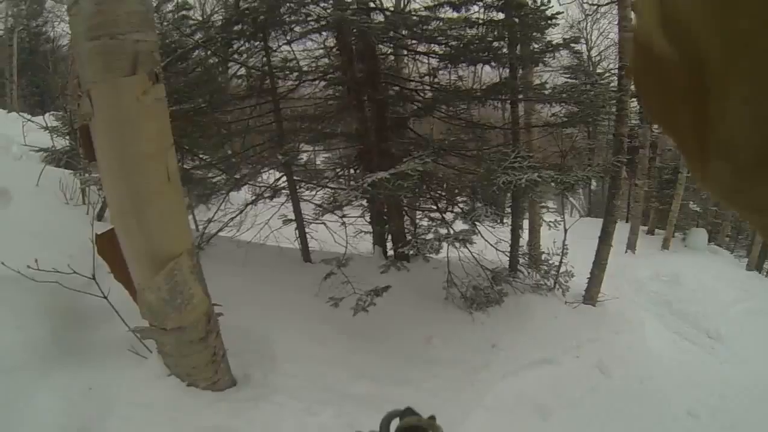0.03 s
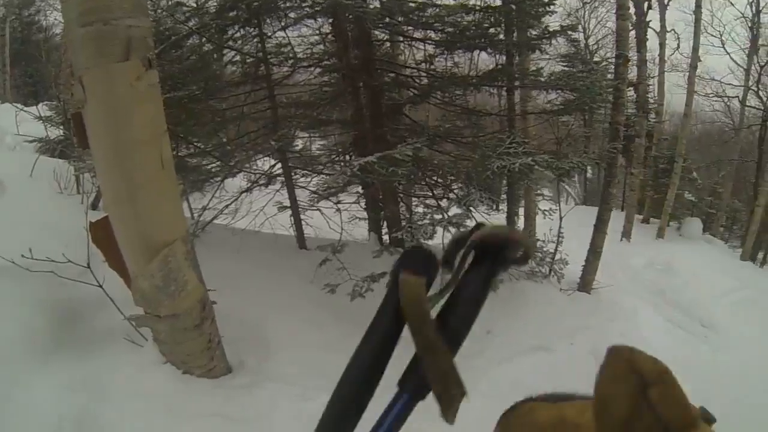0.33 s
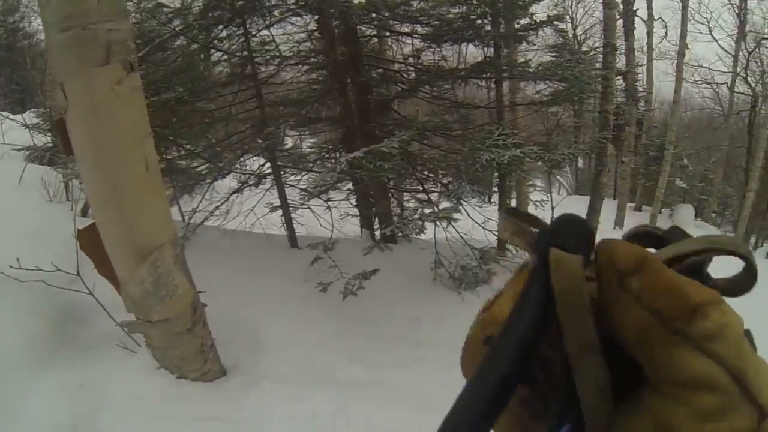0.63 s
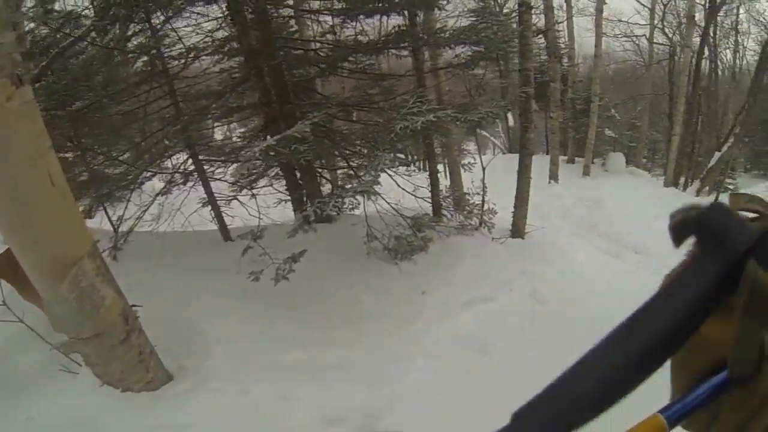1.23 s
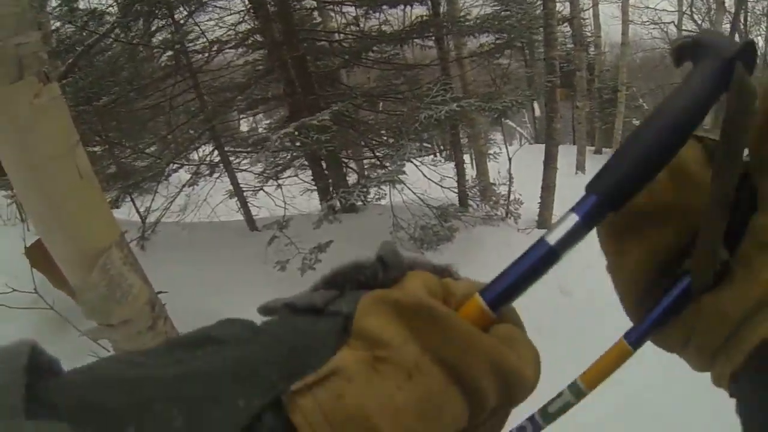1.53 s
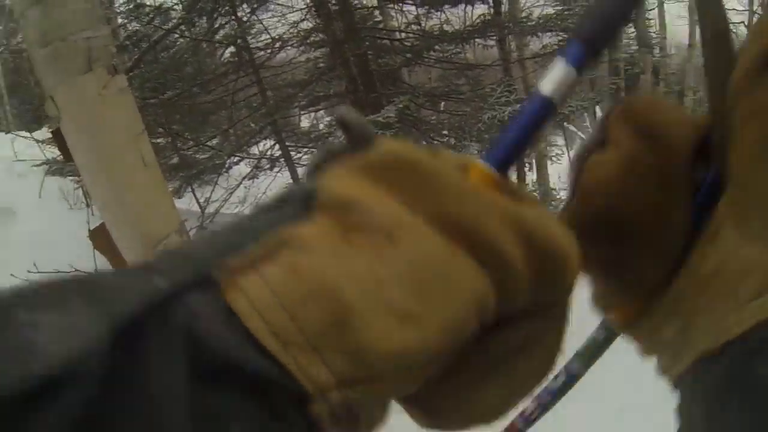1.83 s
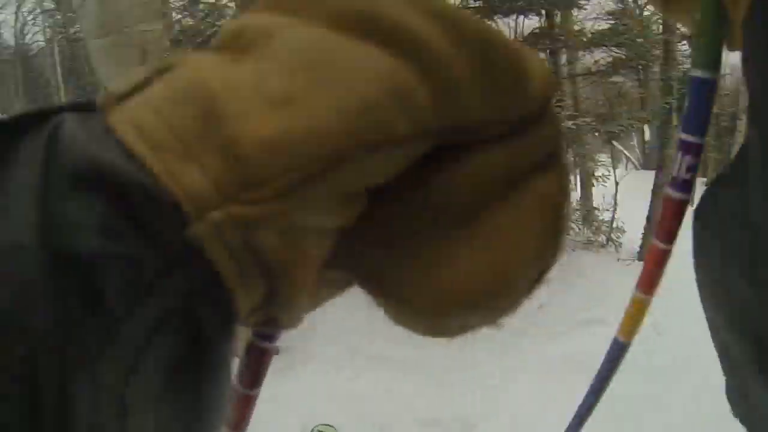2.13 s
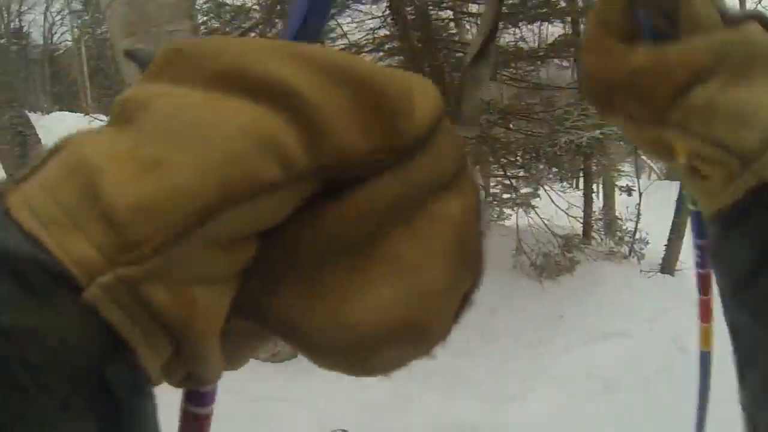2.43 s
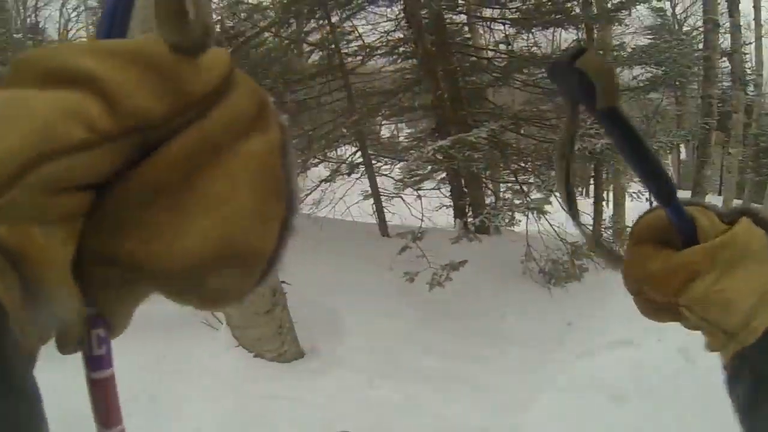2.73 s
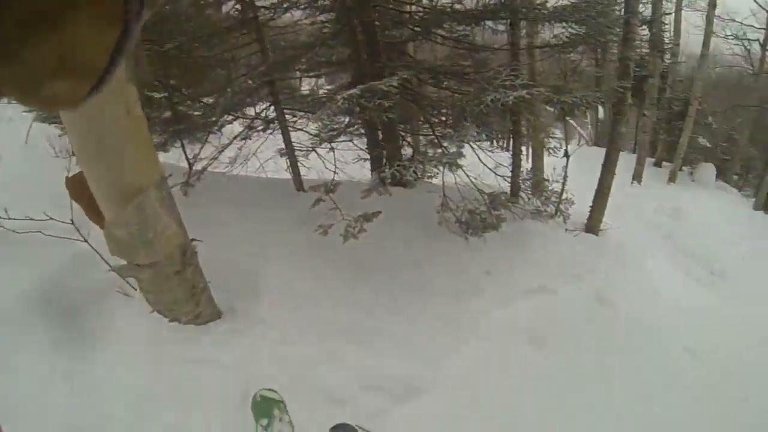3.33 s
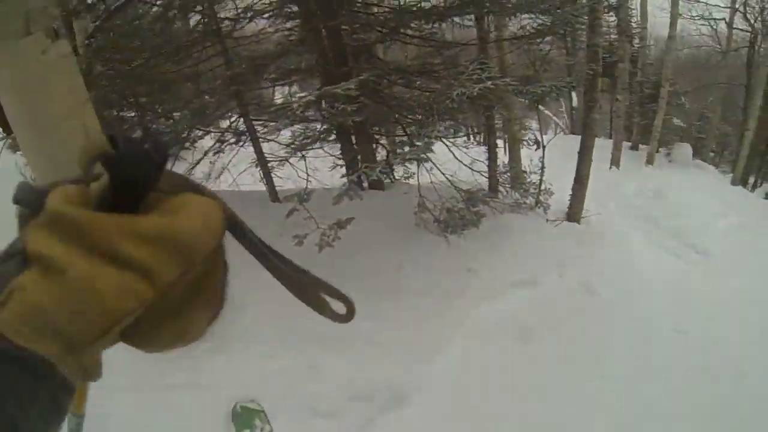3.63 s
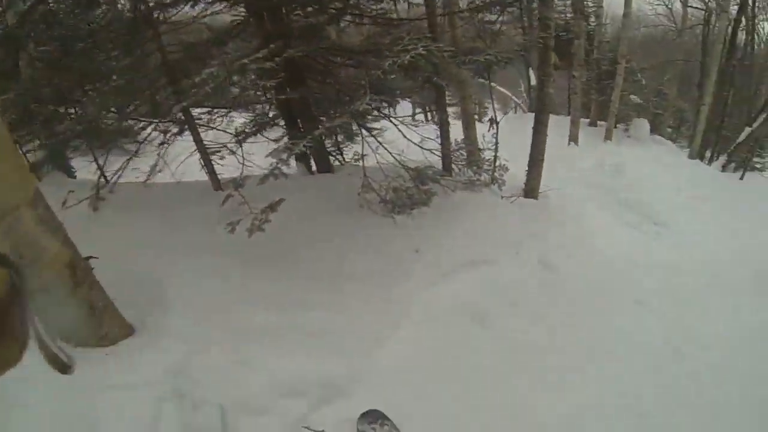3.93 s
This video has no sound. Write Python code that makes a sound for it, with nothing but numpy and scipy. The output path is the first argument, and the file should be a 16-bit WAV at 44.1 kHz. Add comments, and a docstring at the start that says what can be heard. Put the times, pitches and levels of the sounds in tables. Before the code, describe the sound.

Ski poles tap softly, then knock louder as leather mittens gather them, and the knocks thin out. Sleeves rustle and bump against a body-worn microphone, with light wind and faint electronic hiss on a quiet snowy slope.

```python
"""On a quiet snowy slope, a body-worn camera's electronics start to hiss, buzz and tick faintly.
Light wind buffets it and sleeves rustle as leather mittens gather two ski poles, which tap softly.
From about 1.2 to 2 seconds the poles knock loudest, while mittens rub and bump the camera's housing.
The knocks then thin out, and a last dull bump comes just before the end."""
import sys
import numpy as np
from scipy import signal
from scipy.fft import rfft, irfft
from scipy.io import wavfile
from scipy.ndimage import uniform_filter1d

SR = 44100
rng = np.random.default_rng(int(sys.argv[2]) if len(sys.argv) > 2 else 0)


def persist_wave(psi):
    """Save psi, clipped to +-1, as 16-bit WAV."""
    counts = np.round(np.clip(psi, -1, 1) * 32767).astype(np.int16)
    wavfile.write(sys.argv[1], SR, np.atleast_2d(counts).T)


N = 176400
T = np.arange(N) / SR
FREQS = np.fft.rfftfreq(N, 1 / SR)


def amp(db):
    """Turns decibels into a gain."""
    return 10 ** (np.asarray(db) / 20)


def unit(x):
    """Scales a sound to an average (rms) level of 1."""
    return x / np.sqrt(np.mean(x ** 2) + 1e-20)


def level(points):
    """Gain over time from (seconds, dB) points."""
    return amp(np.interp(T, *np.transpose(points)))


def colour(x, points):
    """Shapes a sound's tone by (Hz, dB) points, at an average level of 1."""
    hz, db = np.transpose(points)
    gain = amp(np.interp(np.log(FREQS + 1), np.log(hz + 1), db))
    return unit(irfft(rfft(x) * gain, N))


def add(mix, start, sound):
    """Mixes a sound in at a start time in seconds."""
    part = mix[max(round(start * SR), 0):][:len(sound)]
    part += sound[:len(part)]


def steady_noise(tone, window):
    """Noise of a given tone, with its slow swells evened out."""
    noise = colour(rng.standard_normal(N), tone)
    return noise / np.sqrt(uniform_filter1d(noise ** 2, window) + 1e-9)


def bursts(period, delay, length, hz, width, db):
    """A narrow band of hiss, switched on once in every period."""
    band = unit(irfft(rfft(rng.standard_normal(N)) / (1 + (2 * (FREQS - hz) / width) ** 4) ** .5, N))
    offset = (T - delay + period / 2) % period - period / 2
    return amp(db) * band * np.exp(-(2 * offset / length) ** 4 / 2)


# The tone of the hiss. Each row: frequency in Hz, relative level in dB.
HISS_TONE = [(300, -17), (3000, 3.5), (5200, 4), (6700, -4.5), (7500, 2.5), (8300, 7.5), (9100, -8),
             (10300, 7.5), (11400, -5.5), (12400, 2), (13100, -11), (14200, -6), (15000, 2)]
# One buzz cycle. Each row: delay and length in seconds, pitch and width in Hz, relative level in dB.
BUZZ_BURSTS = [(0.0019, 0.0016, 8400, 770, -64.5), (0.0019, 0.0036, 8000, 300, -80),
               (0.0024, 0.0044, 14500, 670, -65.5), (.0098, .0012, 13000, 900, -73)]
# The input opening. Each row: time in seconds, gain in dB.
OPENING = [(.07, -18), (.4, -11.5), (.9, -2), (1.1, -2)]


def electronics(buzz_hz=59.94):
    """The camera's circuits hiss, buzz and tick, growing louder as the input opens."""
    hiss = amp(-65.5) * colour(rng.standard_normal(N), HISS_TONE)
    uneven = amp(2 * rng.standard_normal(N))[(T * buzz_hz).astype(int)]  # a new gain each cycle
    buzz = uneven * sum(bursts(1 / buzz_hz, *row) for row in BUZZ_BURSTS)
    tick = bursts(period=.25, delay=.1065, length=.0038, hz=8244, width=650, db=-61.5)
    return (hiss + buzz + tick) * level(OPENING)


# The gusts. Each row: time in seconds, level in dB.
WIND_LEVELS = [(0.07, -55.5), (0.31, -73), (0.35, -49.5), (0.75, -62.5), (0.81, -44.5), (0.93, -47.5),
               (1.21, -53.5), (1.24, -39), (1.57, -47.5), (1.7, -41), (2.24, -39), (2.36, -51), (2.42, -36),
               (2.96, -50.5), (3.07, -41), (3.16, -53), (3.97, -35.5), (4.0, -65.5)]
# Their tone. Each row: frequency in Hz, relative level in dB.
WIND_TONE = [(5, -20), (16, 7), (30, -6), (52, -9.5), (80, -13), (150, -37), (400, -71)]


def wind():
    """Light wind buffets the camera with a very deep noise."""
    return steady_noise(WIND_TONE, window=5000) * level(WIND_LEVELS)


# The handling rumble. Each row: time in seconds, level in dB.
RUMBLE_LEVELS = [(.07, -62), (.2, -65), (.36, -50), (.43, -64.5), (.6, -52.5), (.72, -53.5), (.82, -53),
                 (1.02, -52.5), (1.18, -50), (1.3, -40), (1.42, -41.5), (1.48, -47.5), (1.6, -44.5),
                 (1.67, -39), (1.73, -39), (1.8, -47), (1.87, -41), (2.03, -41), (2.15, -42.5), (2.26, -48),
                 (2.34, -46), (2.47, -47), (2.6, -51.5), (2.72, -49), (2.88, -55.5), (3.02, -52.5),
                 (3.12, -51), (3.22, -46.5), (3.33, -55.5), (3.48, -54), (3.68, -48), (3.76, -47),
                 (3.84, -37), (3.91, -50), (4, -41.5)]
# Its tone. Each row: frequency in Hz, relative level in dB.
RUMBLE_TONE = [(20, -14), (60, 1), (100, 3), (145, 2.5), (200, -3.5), (270, -12), (335, -15), (450, -26),
               (600, -35), (1200, -79)]


def mount_rumble():
    """The moving mount carries a low rumble into the camera."""
    return steady_noise(RUMBLE_TONE, window=2600) * level(RUMBLE_LEVELS)


# The tone of rubbing. Each row: frequency in Hz, relative level in dB.
FRICTION_TONE = [(260, -15), (450, -9), (600, -12.5), (700, -8), (825, -0.5), (960, -9.5), (1130, -6),
                 (1300, 1), (1520, -1), (1960, -6), (2550, -10.5), (3050, -8), (3400, -14), (3720, -19.5),
                 (4650, -23), (5300, -26), (7000, -35), (11000, -42), (15000, -60)]


def friction(slips_per_second=3200):
    """Cloth slips in many tiny jerks, coloured by the ringing of the housing."""
    slips = (rng.random(N) < slips_per_second / SR) * rng.choice([-1, 1], N)
    slips = slips * amp(3.5 * np.minimum(rng.exponential(1, N), 4))  # a few are much stronger
    flutter = unit(uniform_filter1d(uniform_filter1d(rng.standard_normal(N), 500), 300))
    smooth = 0.64 * rng.standard_normal(N)
    return colour(unit(slips) + smooth, FRICTION_TONE) * amp(1.33 * flutter)


# The jacket's rustle. Each row: time in seconds, level in dB.
RUSTLE_LEVELS = [(.07, -78), (.3, -71.5), (.47, -67), (.56, -70), (.7, -65.5), (.82, -59.5), (1.0, -63.5),
                 (1.08, -58), (1.2, -57.5), (1.35, -51.5), (1.49, -55.5), (1.57, -56), (1.66, -50.5),
                 (1.84, -54.5), (2.15, -52.5), (2.27, -57), (2.36, -57), (2.5, -57), (2.62, -63),
                 (2.69, -59), (2.9, -62), (3.16, -58.5), (3.3, -61), (3.5, -60), (3.68, -56.5), (3.73, -57),
                 (3.88, -56), (4, -59.5)]
# Mitten strokes. Each row: start and length in seconds, level in dB, brightness from 0 to 1.
STROKES = [(1.22, 0.083, -46.5, 0.1), (1.349, 0.11, -53, 0), (1.724, 0.021, -41.5, 0.05),
           (1.747, 0.035, -42.5, 0.42), (1.879, 0.033, -49.5, 1), (1.99, .042, -47, 0.7),
           (2.054, 0.07, -49.5, 0.36), (2.385, .045, -57, 0.9), (3.188, 0.03, -58.5, 0.4),
           (3.601, 0.022, -54, 0.1), (3.81, 0.055, -46, 0.66), (3.941, 0.036, -42, 0.13)]


def clothing(dull_hz=2000):
    """The jacket rustles throughout, and single mitten strokes swell out of it."""
    out = friction() * level(RUSTLE_LEVELS)
    rub = friction()
    dull = irfft(rfft(rub) / (1 + (FREQS / dull_hz) ** 8), N)
    for start, length, db, brightness in STROKES:
        arch = abs(np.sin(np.pi * np.clip((T - start) / length, 0, 1))) ** 0.26
        out += amp(db) * arch * (dull + brightness * (rub - dull))
    return out


# Dull bumps. Each row: start in seconds, level in dB, pitch in Hz.
HOUSING_BUMPS = [(0.269, -44.5, 255), (0.328, -41.5, 144), (1.225, -27.5, 185), (1.2506, -30.5, 336),
                 (1.253, -28.5, 125), (1.345, -32.5, 217), (1.373, -30, 142), (1.381, -25.5, 134),
                 (1.403, -32, 247), (1.438, -27.5, 194), (1.631, -25.5, 194), (1.652, -29.5, 280),
                 (1.892, -22, 107), (1.954, -28.5, 147), (2.005, -31.5, 167), (2.199, -29.5, 133),
                 (2.385, -35, 170), (2.565, -31.5, 231), (3.604, -29.5, 130), (3.797, -27.5, 109),
                 (3.949, -15.5, 208), (3.9685, -20, 273)]


def bumps(rise_s=0.0014, fade_s=0.025):
    """Soft blows rock the camera's housing for a few cycles."""
    out, t = np.zeros(N), T[:SR // 8]
    shape = (1 - np.exp(-(t / rise_s) ** 2)) * np.exp(-np.log(1000) * t / fade_s)
    for start, db, hz in HOUSING_BUMPS:
        add(out, start, -amp(db) * shape / shape.max() * np.sin(2 * np.pi * hz * t))
    return out


# The held poles' ringing tones, heard through the housing.
# Each row: pitch in Hz, relative level in dB, seconds to fade by 60 dB.
POLE_TONES = [(818, 3.5, 0.021), (1230, -0.5, 0.016), (1420, 1.5, 0.021), (1670, 0.5, 0.011),
              (2047, 1.5, 0.013), (2440, -2.5, 0.014), (2750, -3, 0.014), (2943, -5, 0.018),
              (3360, -5.5, .016), (3850, -9.5, 0.017), (4640, -1.5, 0.012), (5720, -12, 0.0082),
              (6300, -15, 0.0039), (7260, -21, 0.0061), (8240, -18, 0.0065), (10000, -27, 0.0029)]
# The knocks. Each row: start in seconds, relative level in dB, then gains in dB
# for the low (900 Hz), middle (2800 Hz) and high (5000 Hz) tones.
POLE_KNOCKS = [(0.269, -51.5, -10, -16.5, -26), (0.386, -53.5, -27, -3, -9),
               (0.455, -43.5, -18, -27, -26.5), (0.609, -40, -39, -17.5, -26),
               (0.897, -34.5, -38, -16, -23), (0.917, -34.5, -26, -2, -14), (1.224, -16.5, -19, -24.5, -56),
               (1.251, -14, -15, -28.5, -20), (1.269, -24.5, -18, -21.5, -28),
               (1.518, -33.5, -14.5, -20, -27), (1.63, -13.5, -24.5, -8.5, -9), (1.636, -29, -18, -2, -4),
               (1.643, -21.5, -16, -4.5, -4.5), (1.899, -20, -21, -22.5, -32.5),
               (1.995, -30, -18, -19, -22.5), (2.068, -32.5, -28, -17, -34), (2.181, -34, -31, -8.5, -23.5),
               (2.231, -31, -9, -19, -45), (2.398, -34, -16, -18, -21), (2.546, -33.5, -15.5, -17.5, -24),
               (2.566, -36.5, -15, -30, -31), (3.224, -30.5, -16.5, -17, -30.5),
               (3.955, -33, -4.5, -17, -42)]


def poles(contact_s=0.00034, chatter_s=0.0053, crack_s=0.001, core_db=-11):
    """Each knock cracks, chatters and sets the poles ringing; where it lands sets the tone."""
    out, t = np.zeros(N), T[:SR // 10]
    hz, tone_db, fade_s = np.transpose(POLE_TONES)
    signs = (-1) ** np.arange(len(hz))
    shapes = (1 - np.exp(-t / contact_s)) * np.exp(-np.log(1000) * t / fade_s[:, None])
    tones = signs[:, None] * np.sin(2 * np.pi * hz[:, None] * t) * shapes
    crack_band = signal.butter(2, [2500, 9000], "band", fs=SR)
    for start, db, low_db, mid_db, high_db in POLE_KNOCKS:
        balance_db = np.interp(hz, [900, 1250, 1700, 2500, 3400, 4600],
                               [low_db, core_db, core_db, mid_db, mid_db, high_db])
        chatter, grit = rng.standard_normal((2, len(t)))
        force = (t == 0) + amp(-28.5) * chatter * np.exp(-t / chatter_s)
        ring = signal.fftconvolve(amp(tone_db + balance_db) @ tones, force)[:len(t)]
        ring *= np.exp(-t * 1.9 * max(core_db - mid_db, 0))  # dull, mitten-muffled knocks die sooner
        crack = amp(high_db - 11.5) * signal.lfilter(*crack_band, grit * np.exp(-t / crack_s))
        add(out, start + 0.0002, amp(db + 3) * (ring + crack))
    return out


def scene():
    """Adds up all the sources; snow gives no echo."""
    return (poles() + bumps() + clothing() + mount_rumble() + wind() + electronics())[None]


def record(dry):
    """The input switches on after 0.07 seconds, and the highest treble is cut."""
    switch_on = np.clip((T - 0.07) / 0.0061, 0, 1)
    treble_cut = signal.firwin(255, 15500, window=("kaiser", 8), fs=SR)
    return signal.oaconvolve(dry * switch_on, treble_cut[None], "same")


dry = scene()
out = record(dry)
persist_wave(out)
```